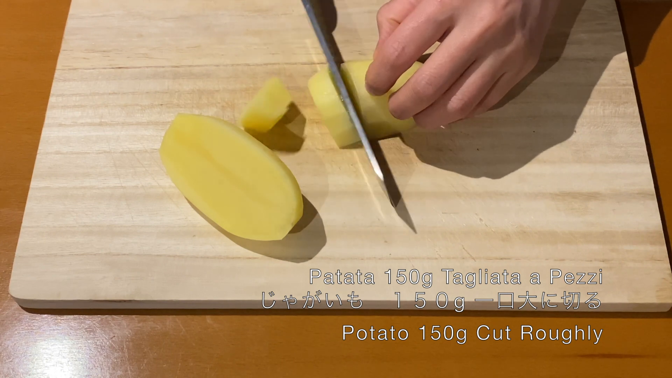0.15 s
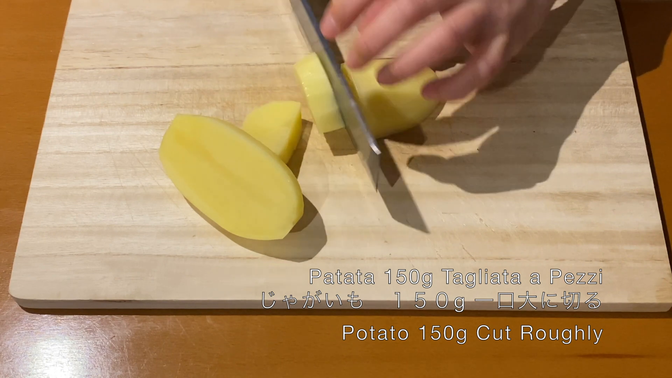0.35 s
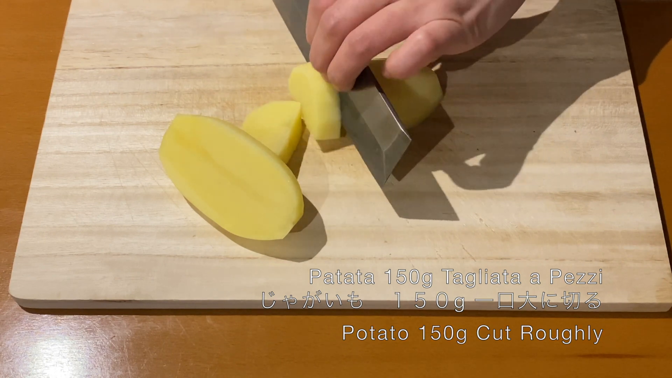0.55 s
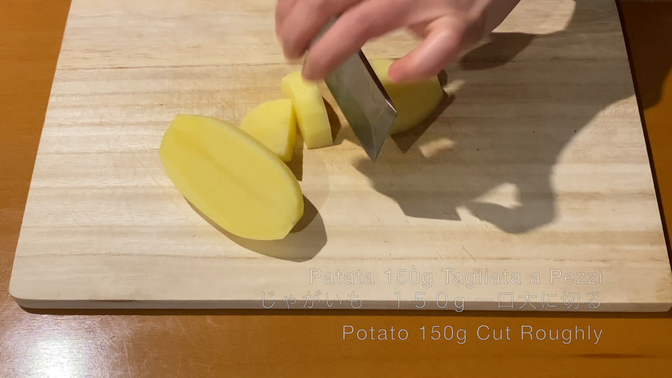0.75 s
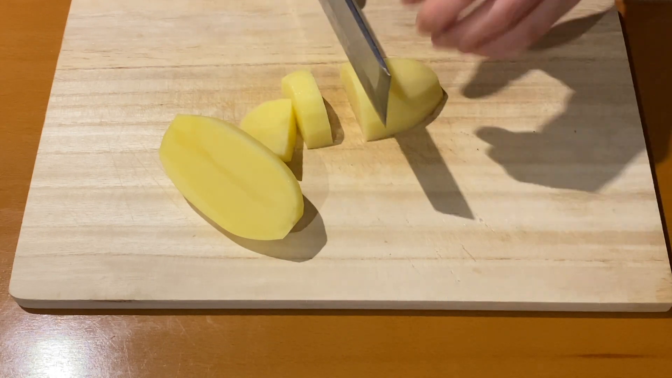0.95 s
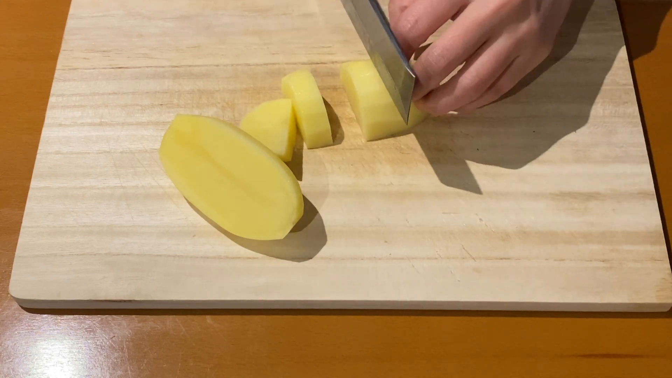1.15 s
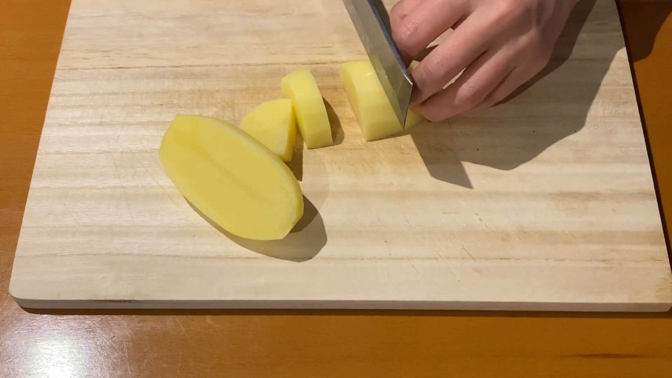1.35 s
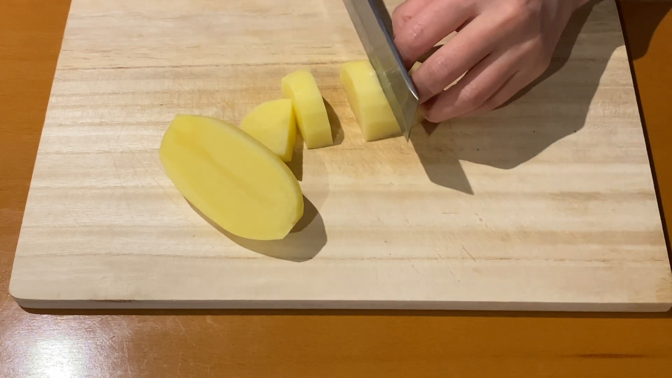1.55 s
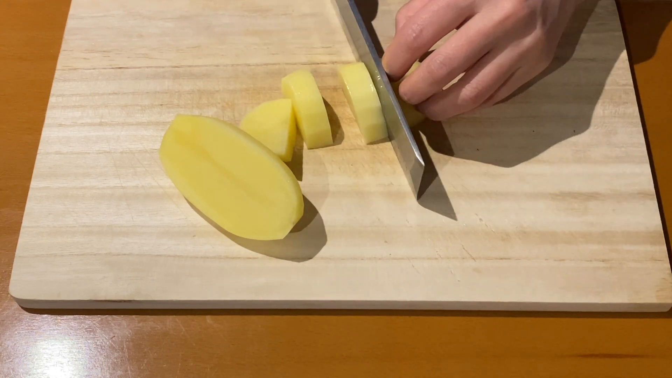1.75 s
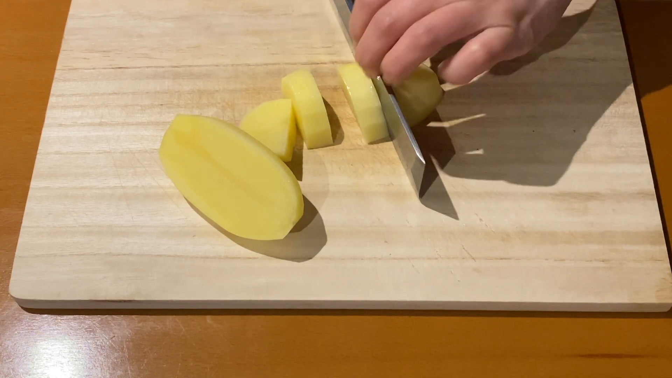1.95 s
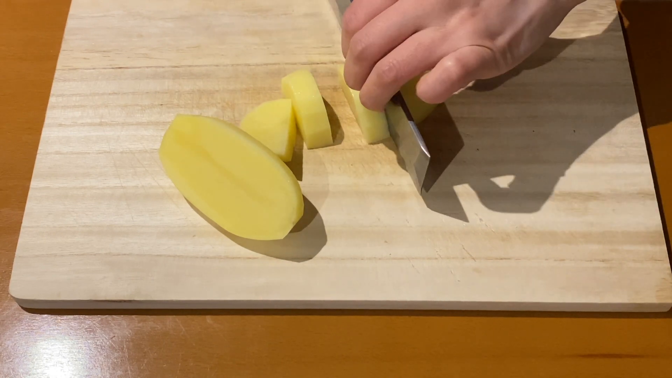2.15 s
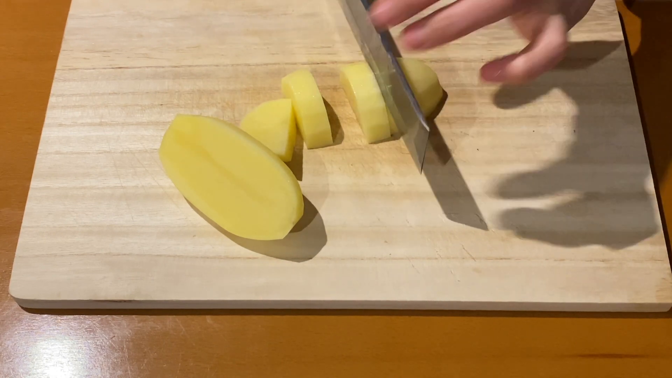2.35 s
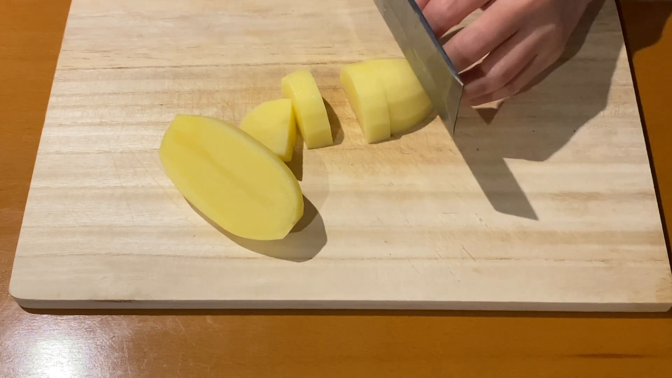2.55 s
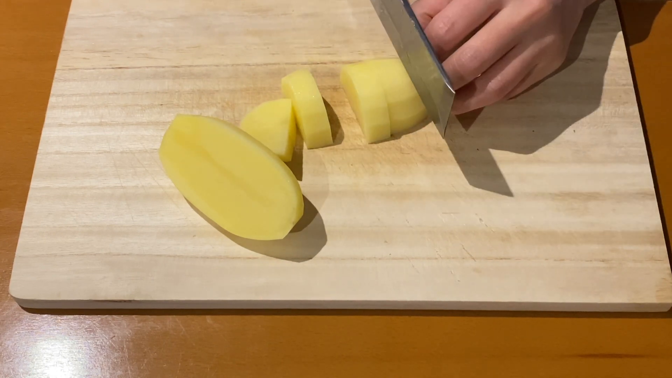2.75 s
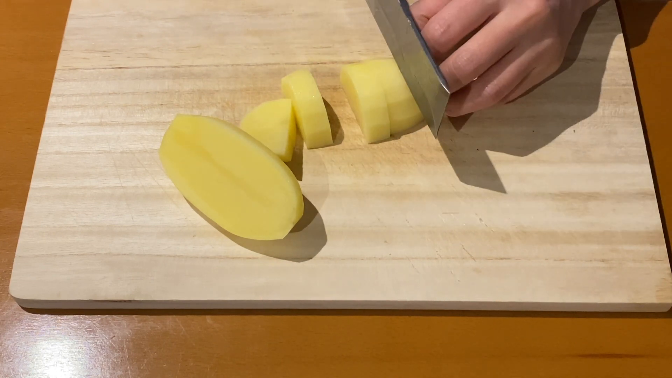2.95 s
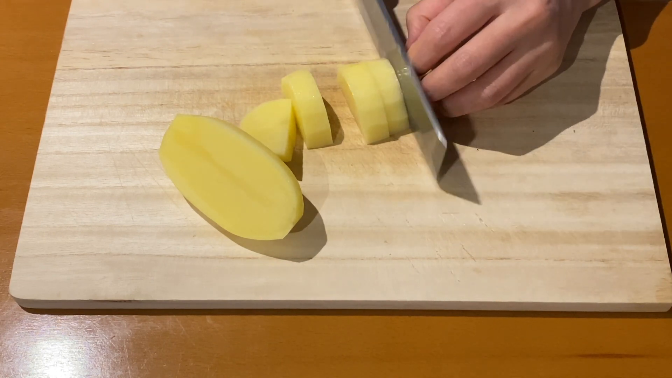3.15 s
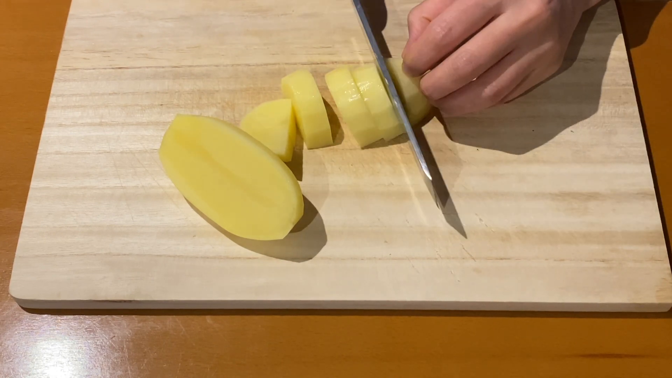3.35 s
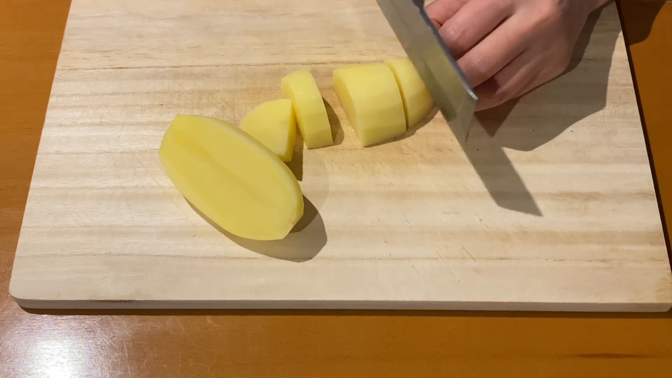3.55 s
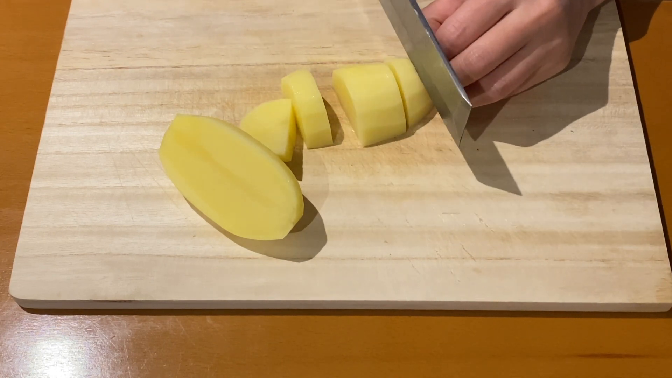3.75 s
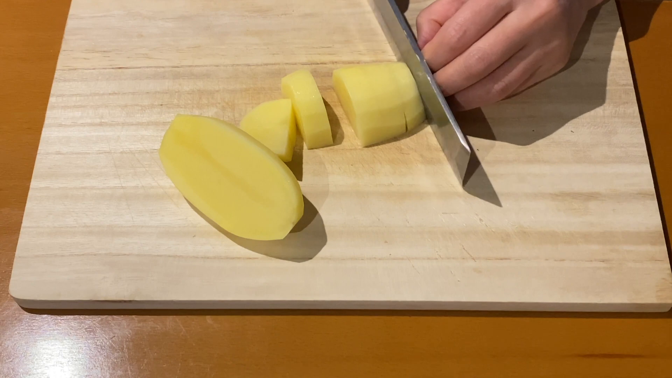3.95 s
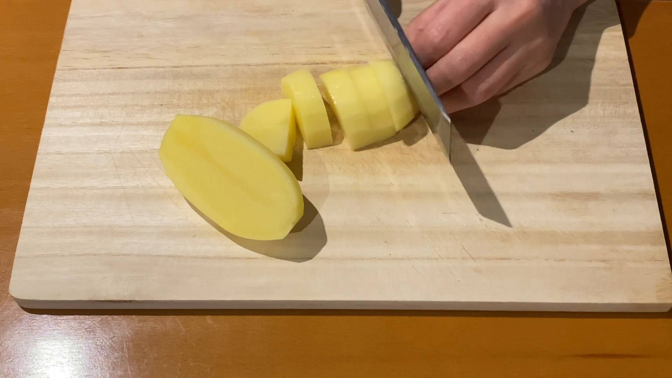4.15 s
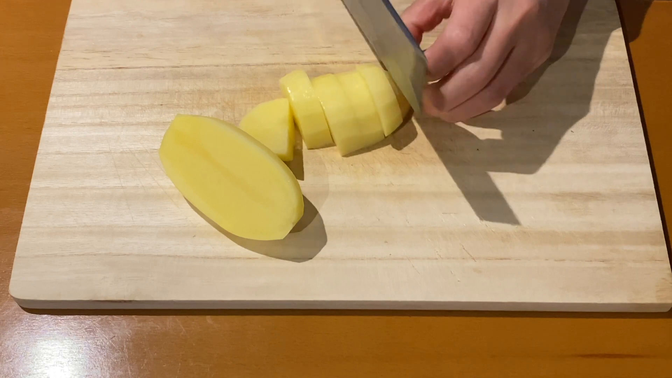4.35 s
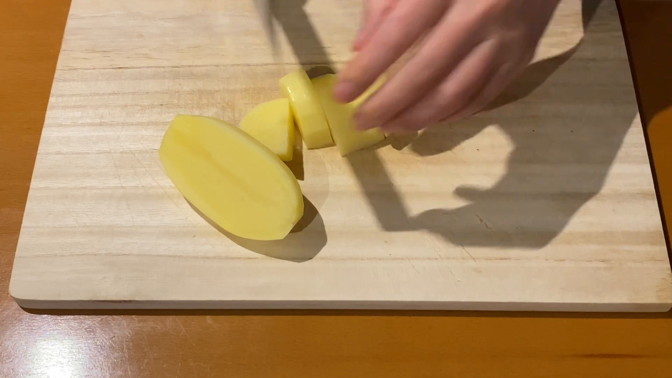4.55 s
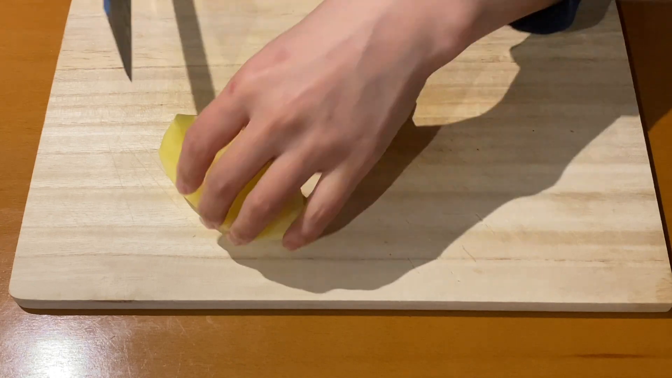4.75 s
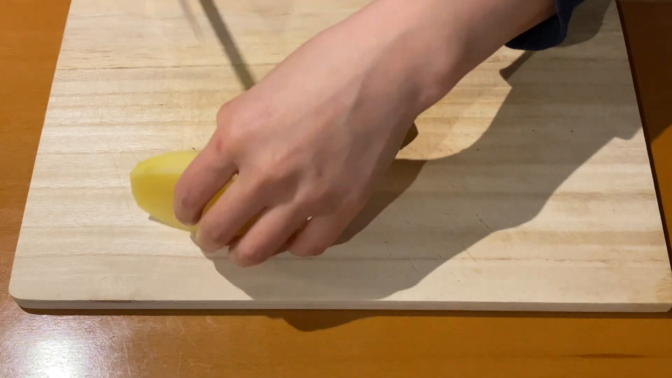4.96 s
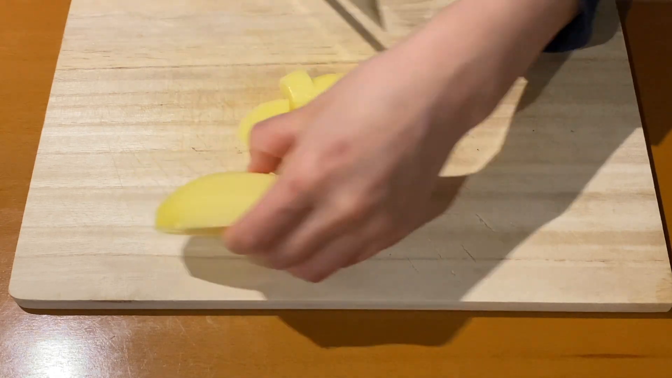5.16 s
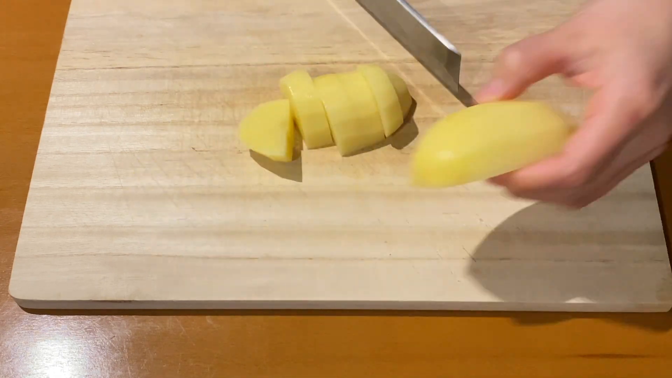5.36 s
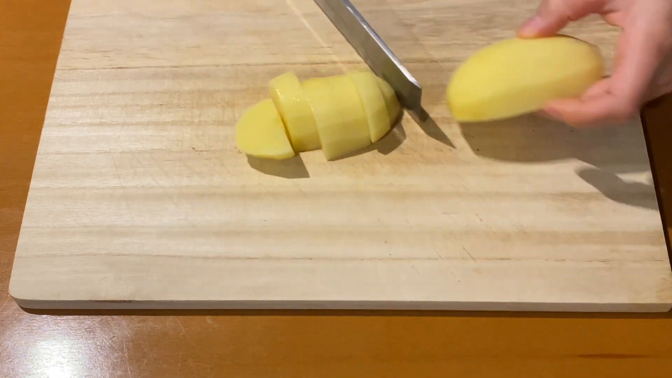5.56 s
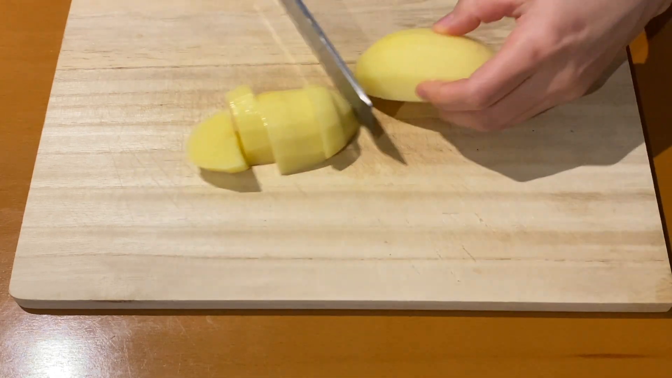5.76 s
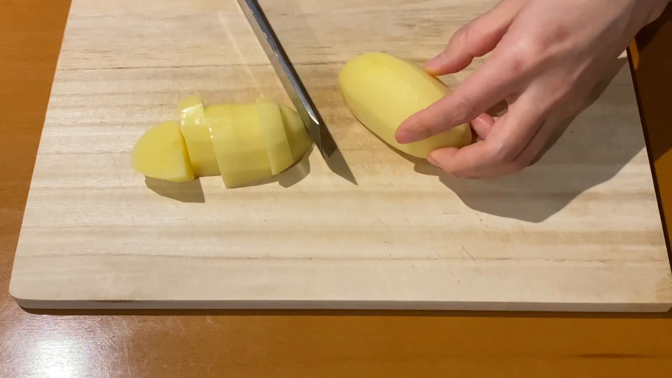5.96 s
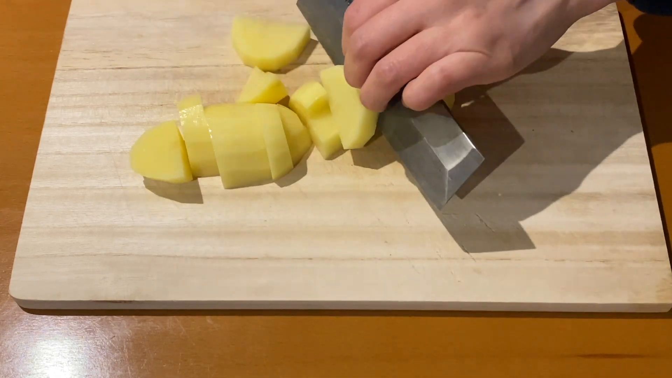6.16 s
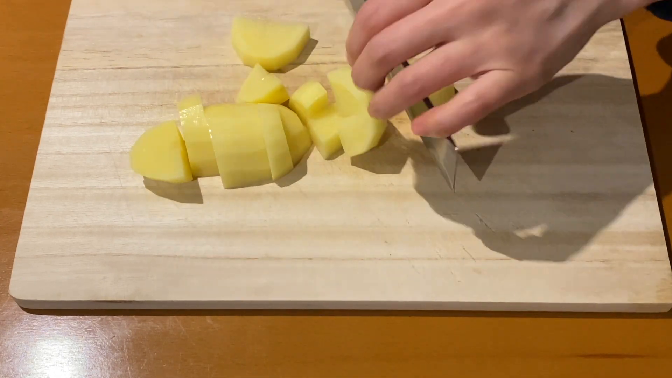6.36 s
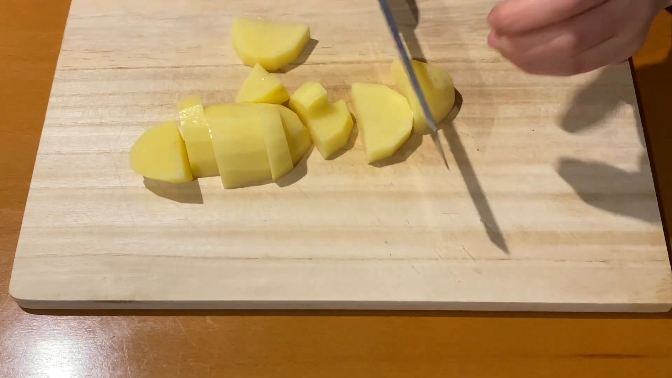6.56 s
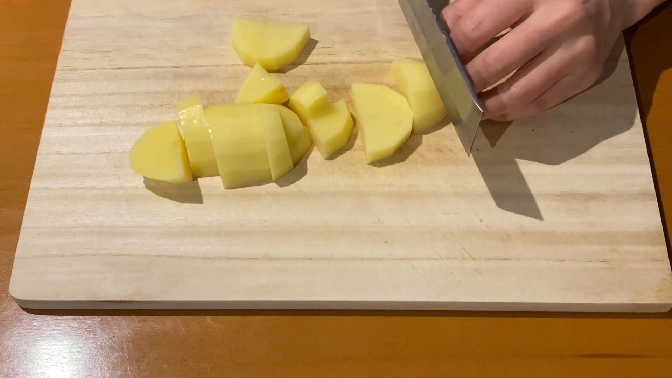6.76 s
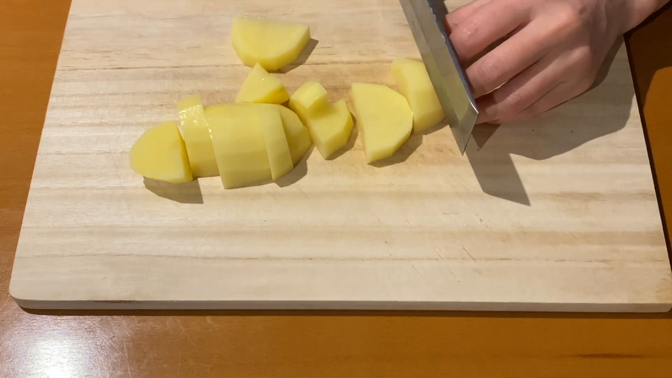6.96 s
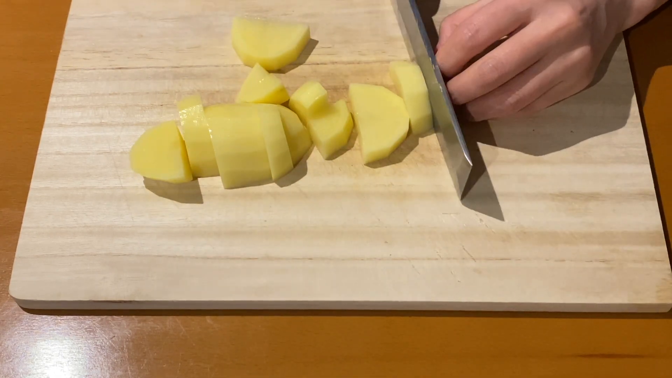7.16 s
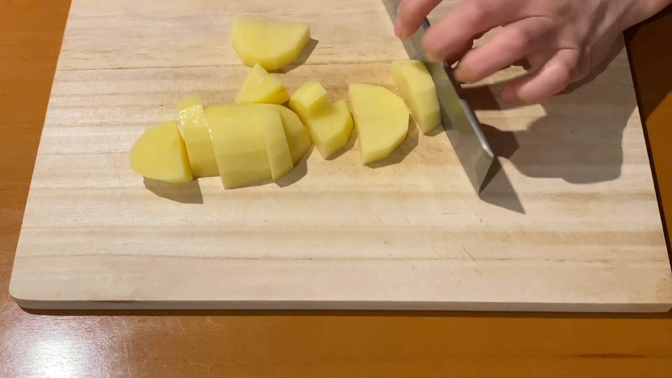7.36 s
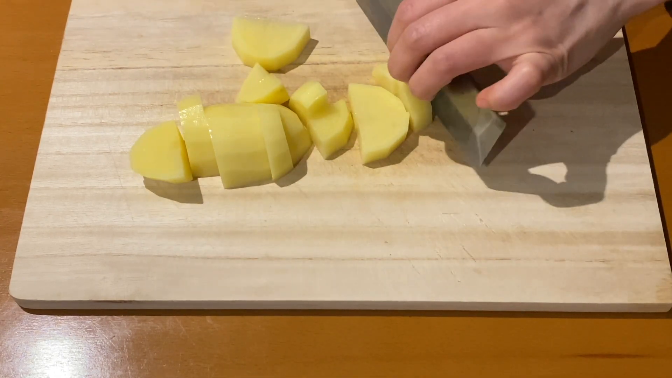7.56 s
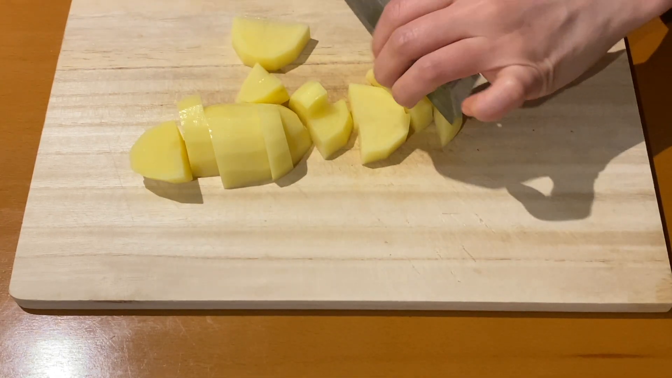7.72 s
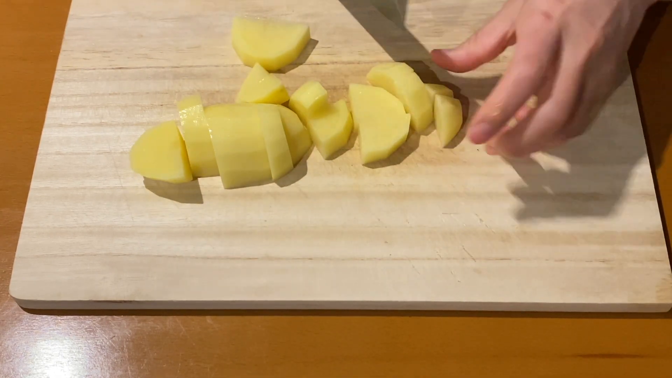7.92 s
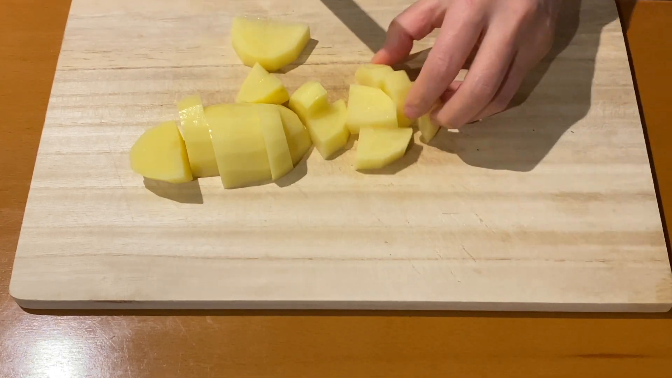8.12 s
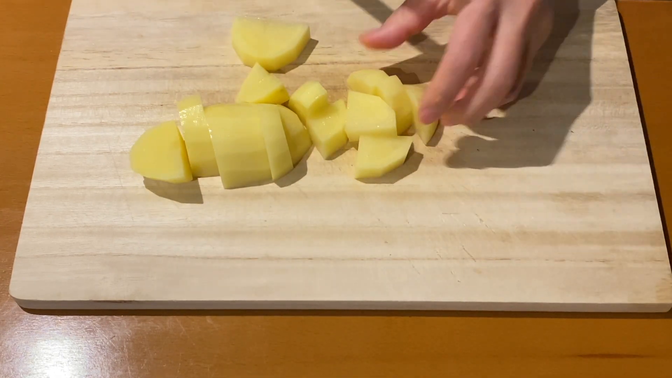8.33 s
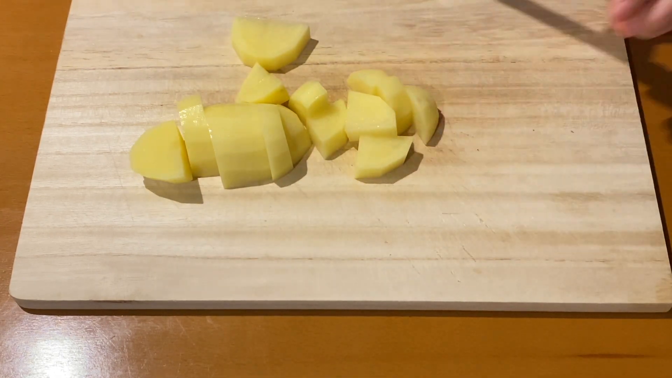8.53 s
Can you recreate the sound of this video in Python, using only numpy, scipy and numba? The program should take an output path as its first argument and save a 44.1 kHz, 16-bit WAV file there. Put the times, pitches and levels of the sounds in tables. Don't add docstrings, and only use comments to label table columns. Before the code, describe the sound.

Very close to a wooden board, a kitchen knife slices raw potato. A slow crisp slice swells into a loud dry knock, then a quicker slice and a short hard chop follow. A long quieter stretch has soft slides and ticks of pieces, then lighter taps and one last slice with a strong knock. Faint steel scrapes and wet rubs close it, over low fridge hum in a small, briefly reverberant kitchen.

```python
import sys
import numpy as np
from scipy import signal
from scipy.fft import rfft, irfft, next_fast_len
from scipy.io import wavfile
from scipy.ndimage import uniform_filter1d
from numba import njit

SR = 44100
rng = np.random.default_rng(int(sys.argv[2]) if len(sys.argv) > 2 else 0)


def to_linear_factor(level_db):
    exponent = np.asarray(level_db, float) / 20
    return 10 ** exponent


def transcribe(signal):
    frames = np.atleast_2d(signal).T
    limited = np.clip(frames, -1, 1)
    pcm = np.round(limited * 32767).astype(np.int16)
    wavfile.write(sys.argv[1], SR, pcm)


N = 383229


def over(hz, table, column=1):
    rows = np.array(table, float)
    return np.interp(np.log(hz + 1), np.log(rows[:, 0]), rows[:, column])


def colour(x, table):
    size = next_fast_len(len(x))
    gain = to_linear_factor(over(np.fft.rfftfreq(size, 1 / SR), table))
    y = irfft(rfft(x, size) * gain, size)[:len(x)]
    return y / np.sqrt(np.mean(y ** 2))


@njit
def svf(x, hz, width):
    y, band, low = np.empty(len(x)), 0., 0.
    for i in range(len(x)):
        g, k = np.tan(np.pi * hz[i] / SR), width / hz[i]
        v = (band + g * (x[i] - low)) / (1 + g * (g + k))
        band, low, y[i] = 2 * v - band, low + 2 * g * v, k * v
    return y


def walk(rate):
    k = int(SR / rate)
    held = np.repeat(rng.standard_normal(N // k + 1), k)
    return 1.3 * uniform_filter1d(uniform_filter1d(held, k), k)[:N]


def add(out, x, s):
    i = max(int(s * SR), 0)
    out[i:i + len(x)] += x[:N - i]


def peak(x, db):
    return x * to_linear_factor(db) / np.abs(x).max()


# f/Hz, level per Hz/dB
HUM = [(25, -15), (45, 4.5), (70, 2.5), (180, -1.5), (330, -6), (600, 0.5), (900, -9), (1350, -24),
       (1650, -27), (2200, -23.5), (2800, -32.5), (5500, -33), (11500, -41), (14500, -58)]
# f/Hz, level per Hz/dB
HISS = [(2000, -60), (2900, -19.5), (3350, -3.5), (3900, -0.5), (4150, -8.5), (4500, 0.5), (4950, -6),
        (5150, -1), (5350, -21), (5800, -60.5)]
# f/Hz, level/dB
WHINE = [(183.0, -75), (446.8, -77), (597.5, -74), (3510, -91.5), (3871, -89.5), (3957, -96), (4301, -90.5),
         (4500, -90.5), (4544, -97), (5146, -94.5)]
HUM_DB, HISS_DB = -62.5, -76


def fridge():
    t, swell = np.arange(N) / SR, walk(1.7)
    lines = np.zeros(N)
    for hz, db in WHINE:
        lines += to_linear_factor(db + 6 + 3.8 * walk(18)) * np.sin(2 * np.pi * (hz * t + rng.random()))
    air = []
    for _ in range(2):
        hum = to_linear_factor(HUM_DB + 0.16 * swell + 1.5 * walk(9)) * colour(rng.standard_normal(N), HUM)
        hiss = to_linear_factor(HISS_DB + .6 * walk(3.6)) * colour(rng.standard_normal(N), HISS)
        air.append(hum + hiss)
    return air[0] + lines, air[1]


def grains(per_s, spread_db):
    chance = rng.random((2, N))
    burst_db = spread_db * np.minimum(-np.log(1 - chance[1]), 3.5)
    size = (chance[0] < per_s / SR) * to_linear_factor(burst_db)
    return size * rng.choice([-1., 1.], N) + 0.85 * rng.standard_normal(N)


# entry t/s, full force t/s,
# entry level/dB, full-force level/dB, grit level re flesh/dB
CUTS = [
    (1.363, 1.531, -62.5, -47, 3),
    (2.915, 2.967, -70.5, -47, 0),
    (3.687, 3.697, -58, -45.5, -3),
    (6.895, 6.946, -71.5, -45.5, -.5),
]
# t/s, level/dB, 30 dB fade t/s (negative: row silent), grit level re
# flesh/dB, flesh resonance f/Hz
NICKS = [(.006, -55.5, 0.15, -16, 1248), (.026, -76, -0.1, -25, 1100), (.508, -90, -0.5, 0, 980),
         (1.362, -62, 0.14, -13.5, 1117), (1.984, -81.5, 0.2, -3, 1098), (2.898, -63, 0.47, -12.5, 1195),
         (3.622, -44, 0.03, -21.5, 1320), (5.975, -51, 0.08, -38, 1125), (6.06, -55, 0.12, -40, 1076),
         (6.27, -89, 0, 1, 995), (6.813, -62.5, 0.07, -12, 1173), (7.535, -75, -0.04, 1.5, 990),
         (7.6, -74, 0.5, -6, 1050)]
# t/s, length t/s, level/dB, grit level re flesh/dB,
# flesh resonance f/Hz
SLIDES = [(0.688, .09, -79.5, -10, 985), (2.12, .05, -81.5, -9, 1050), (2.685, .07, -77, -10, 1180),
          (3.18, .08, -69.5, -1.5, 1050), (4.022, .13, -67, -2, 1340), (4.67, .08, -78.5, -5, 1010),
          (5.372, .04, -71, -0.5, 1270), (5.4, .16, -75.5, 0, 1200), (5.551, .35, -68, 4, 1280),
          (6.149, .07, -92, 5.5, 1000), (7.269, .07, -68, -5.5, 1340), (7.36, .14, -84.5, 7, 1200),
          (7.907, .07, -68, -4.5, 1190), (7.99, .14, -71.5, -4, 1090), (8.589, .14, -83, 5, 1110)]
BOTTOM_HZ, RISE_HZ_PER_S = 1370, 1400
CUT_RASP_DB, RASP_DB_PER_S, CUT_FINE_DB, FINE_DB_PER_S = -2, 160, -10, 100
EASE_DB, EASE_S = -3.5, .03
SETTLE_DB, SETTLE_GRIT_DB, SETTLE_DB_PER_S = -24.5, 6.5, 170
NICK_ATTACK_S, NICK_FINE_DB = .005, 5
SLIDE_ATTACK, SLIDE_RELEASE = 0.089, .4
SLIDE_EDGE_DB, SLIDE_FINE_DB = 13, -15.5


def strokes_of_flesh(t):
    for enter, full, enter_db, full_db, grit_db in CUTS:
        board = min(knock[0] for knock in KNOCKS if knock[0] > enter)
        u = t[(t >= enter) & (t < board)]
        left = board - u
        db = np.interp(u, [enter, full], [enter_db, full_db])
        flesh_db = db + EASE_DB * np.exp(-left / EASE_S)
        rasp_db = db + grit_db + CUT_RASP_DB - RASP_DB_PER_S * left
        fine_db = db + grit_db + CUT_FINE_DB - FINE_DB_PER_S * left
        yield u, flesh_db, rasp_db, fine_db, BOTTOM_HZ - RISE_HZ_PER_S * left
        u = t[(t >= board) & (t < board + .2)]
        db = full_db + SETTLE_DB - SETTLE_DB_PER_S * (u - board)
        grit = db + SETTLE_GRIT_DB
        yield u, db, grit + CUT_RASP_DB, grit + CUT_FINE_DB, 1000
    for s, top_db, fade, grit_db, hz in NICKS:
        u = t[(t >= s - NICK_ATTACK_S) & (t < s + 1.5 * fade)]
        db = top_db - 30 * np.maximum((s - u) / NICK_ATTACK_S, (u - s) / fade)
        yield u, db, db + grit_db, db + grit_db + NICK_FINE_DB, hz
    for s, length, top_db, grit_db, hz in SLIDES:
        u = t[(t >= s) & (t < s + length)]
        part = (u - s) / length
        ramp = np.minimum(np.minimum(part / SLIDE_ATTACK, (1 - part) / SLIDE_RELEASE), 1)
        db = top_db - SLIDE_EDGE_DB * (1 - ramp)
        yield u, db, db + grit_db, db + grit_db + SLIDE_FINE_DB, hz


# f/Hz, level per Hz/dB
RASP = [(1500, -9.5), (2200, -4), (4000, -2), (6000, -4.5), (8000, -11.5)]
# f/Hz, level per Hz/dB
FINE = [(6000, -16.5), (8000, 11.5), (11000, 2), (14000, -5.5), (15700, -1), (16100, -48)]


def rubs():
    t = np.arange(N) / SR
    gain, hz = np.zeros((3, N)), np.full(N, 1300.)
    for u, *db, flesh_hz in strokes_of_flesh(t):
        on, new = np.round(u * SR).astype(int), to_linear_factor(db)
        hz[on] = np.where(new[0] > gain[0, on], flesh_hz, hz[on])
        gain[:, on] = np.hypot(gain[:, on], new)
    cells = grains(per_s=4400, spread_db=4.0)
    flesh = svf(svf(cells, hz, 480.), hz, 380.)
    flesh = flesh * to_linear_factor(2.8 * np.clip(walk(110), -2, 1.5))
    bulk = colour(cells, [(200, -21), (500, -5), (900, -2.5), (1500, -1.5), (2200, -10), (3200, -26)])
    flesh = flesh / flesh.std() + to_linear_factor(-1.0) * bulk
    spray = grains(per_s=1200, spread_db=2.5)
    flutter = to_linear_factor(1.2 * walk(70))
    rasp = colour(spray, RASP) * flutter
    fine = colour(spray, FINE) * flutter
    return to_linear_factor(-1.0) * gain[0] * flesh + to_linear_factor(3.0) * gain[1] * rasp + to_linear_factor(5.0) * gain[2] * fine


# t/s, peak level/dB, weight level re peak/dB, crack level re peak/dB, loudest ring f/Hz
KNOCKS = [(0.01, -27.5, -3.5, -10.5, 1420), (1.573, 2.5, -16.5, -14.5, 887), (3.072, 3, -16.5, -9.5, 840),
          (3.77, 3, -16.5, -8.5, 857), (5.954, -11.5, -20.5, -44, 1035), (6.073, -28, -9.5, -11.5, 928),
          (6.39, -18, -27, -36.5, 1020), (6.419, -33, -16, -27, 703), (7.012, 2, -16, -10, 855),
          (7.347, -29, -15, -39.5, 715), (7.587, -36, -8, -12.5, 679)]
# f/Hz, level/dB, T60 t/s
BOARD = [(65.6, -4.5, 0.44), (84.74, -6.5, 0.33), (102, 0.5, 0.073), (144, 4, .12), (206, -9, 0.06),
         (301, -4.5, 0.038), (350, -5.5, 0.018), (406, -4, 0.028), (477, -1, 0.029), (530, 0.5, 0.011),
         (633, -2.5, 0.01), (762, -2.5, 0.013), (841.8, -2.5, 0.02), (1000, -1.5, 0.0086),
         (1150, -2.5, 0.0048), (1320, -5.5, 0.029), (1367, -2.5, .009)]
# f/Hz, level per Hz/dB
CRACK = [(1200, -19.5), (1800, 0.5), (2900, -4.5), (3600, -16), (5000, -20.5), (8000, -27), (15000, -30.5)]
# f/Hz, level per Hz/dB
BODY = [(130, -22), (220, -5), (450, -1), (900, 0.5), (1300, -9.5), (2200, -22), (3500, -36.5)]
BODY_DB, SENT_CRACK_DB = -1, -2.5
BOOM_DB, BOOM_PER_SOFT = -13, .4
SPOT_TILT_DB = 24.5


def knocks():
    out, low, sent = np.zeros((3, N))
    t = np.arange(int(.4 * SR)) / SR
    click = 1. * (np.arange(len(t)) == 200)
    push = np.hanning(int(0.00078 * SR))
    hz, mode_db, t60 = np.transpose(BOARD)
    opposed = (-1) ** np.arange(len(hz))
    chance = rng.standard_normal((len(KNOCKS), len(BOARD) + len(t)))
    for (s, top_db, thump_db, crack_db, ring_hz), z in zip(KNOCKS, chance):
        scatter_db = 2 * z[:len(hz)]
        tilt_db = SPOT_TILT_DB * np.log2(hz / 850) * np.log2(ring_hz / 850) * (hz > 450)
        size = to_linear_factor(mode_db + scatter_db + tilt_db) * opposed
        rings = size[:, None] * np.sin(2 * np.pi * np.outer(hz, t)) * to_linear_factor(-60 * t / t60[:, None])
        rise = t * ring_hz / 1.1
        spot = -np.sin(2 * np.pi * ring_hz * t) * (rise * np.exp(-rise)) ** 3.8
        crackle = np.roll(z[len(hz):] * t * np.exp(-t / .001), 200)
        fibres = colour(crackle + .0025 * np.roll(click, 30), CRACK)
        boom = rings[hz < 170].sum(0) * np.minimum(t / 0.0064, 1)
        upper = np.convolve(rings[hz > 450].sum(0), push)
        thump = np.convolve(rings[(hz > 170) & (hz <= 450)].sum(0), push)
        spot, upper = peak(spot, top_db - 7.5), peak(upper, top_db - 14.0)
        fibres = peak(fibres, top_db + crack_db - 4.5)
        boom_db = top_db + thump_db + BOOM_DB - BOOM_PER_SOFT * crack_db - 7.5
        s += .0008
        add(out, spot, s)
        add(out, upper, s + .0009)
        add(out, peak(thump, top_db + thump_db - 3), s + 0.0014)
        add(low, peak(boom, boom_db), s + 0.00069)
        add(out, fibres, s - 170 / SR)
        body = colour(click, [(f * (ring_hz / 850) ** 0.95, db) for f, db in BODY])
        body = body * to_linear_factor(BODY_DB) * np.hypot(spot.std(), upper.std())
        crack = colour(click, CRACK) * to_linear_factor(SENT_CRACK_DB) * fibres.std()
        add(sent, body + crack, s - 170 / SR)
    return signal.sosfilt(signal.butter(1, 90, "high", fs=SR, output="sos"), [out + low, sent + low])


# t/s, peak level/dB, middle level re peak/dB, low level re peak/dB
TICKS = [(0.0113, -56.5, 6, 5), (0.0443, -60, -15, -8), (0.0862, -71, -5.5, 9.5), (0.5097, -64, -11, -17),
         (1.386, -69, -3, 12), (1.4064, -71, -1.5, 9), (1.678, -62, -11.5, -10), (1.9869, -60, -9, -12.5),
         (2.144, -73, 2, 1.5), (3.1921, -53, -4.5, 5), (3.3915, -62.5, -8, 6.5), (3.8621, -54, -7.5, 3),
         (4.6809, -82.5, 3, 8), (4.8686, -84, 12.5, 18.5), (4.9975, -87, 14.5, 2), (5.3782, -65, 1, 14.5),
         (5.5869, -62.5, -11, 16), (5.7618, -45, -17.5, -17.5), (5.89, -71, -5, 4), (5.954, -64, -1, 34.5),
         (6.059, -77, -9, -6), (6.3879, -50, -7, 25), (6.4203, -47, -19.5, -10), (7.3474, -56, -8, 9.5),
         (7.4559, -50, -13.5, -1), (7.5827, -63, -4, 16.5), (7.9264, -67, 3.5, 9.5), (7.9862, -69, 5, 3),
         (4.112, -69, 5, 8), (8.1115, -76, 2.5, 3)]
TICK_MS = 6.2


def ticks():
    out, t = np.zeros(N), np.arange(int(0.042 * SR)) / SR
    fade = np.minimum(t / .001, 1) * np.exp(-3000 * t / TICK_MS)
    noise = rng.standard_normal((len(TICKS), len(t)))
    for (s, top_db, mid_db, low_db), n in zip(TICKS, noise):
        spit = peak(colour(n, FINE) * fade, top_db + 6.5)
        snap = peak(colour(n, RASP) * fade, top_db + mid_db + 11.0)
        note = peak(svf(n * fade, np.full(len(t), 1250.), 350.0), top_db + low_db - 5.0)
        add(out, spit + snap + note, s + .0009)
    return out


# f/Hz, T60 t/s, level re direct energy/dB
KITCHEN = [(60.16, .5, -2.5), (150, 0.8, -5.5), (310, .28, -3.5), (800, 0.29, -8.5), (1990, 0.36, -14),
           (5000, 0.2, -12), (15000, .15, -15.5)]


def kitchen(x):
    t = np.arange(int(.6 * SR)) / SR
    f, tails = np.fft.rfftfreq(len(t), 1 / SR), []
    onset = np.clip((t - .004) / 0.0014, 0, 1)
    for _ in range(2):
        noise, tail = rfft(rng.standard_normal(len(t))), 0
        for hz in 45 * 2 ** np.arange(0, 8.6, .5):
            window = np.clip(1 - 2 * np.abs(np.log2((f + 1) / hz)), 0, 1)
            band = irfft(noise * window, len(t))
            t60 = over(hz, KITCHEN)
            decay = to_linear_factor(over(hz, KITCHEN, column=2) - 60 * t / t60)
            tail = tail + band * decay * np.sqrt(14 / t60 / SR)
        tails.append(signal.fftconvolve(x, tail * onset)[:N])
    return tails


BLADE = [6800, 8180, 8700, 9400, 9820, 10340, 10600, 12800, 11970, 13260, 14250, 14730, 15680]
# t/s, peak level/dB, length t/ms, two modes the grip leaves free f/Hz, f/Hz
STROKES = [(0.503, -58, 8.2, 8180, 10600), (1.364, -51.5, 3, 8700, 14730), (1.4, -63, 30, 10340, 14730),
           (2.468, -74, 4.6, 13260, 14250), (2.897, -66.5, 15.5, 13260, 15680),
           (6.26, -69, 29, 9820, 11970), (6.812, -63.5, 8, 14730, 10340), (6.905, -53.5, 30, 11970, 15680),
           (7.527, -53, 10, 11970, 14730), (7.597, -46.5, 16, 9820, 8700), (7.618, -61.5, 14, 14250, 11970)]
BLADE_T60_S = .075


def blade():
    out, t = np.zeros(N), np.arange(int(.15 * SR)) / SR
    chance = rng.standard_normal((len(STROKES), len(BLADE) + len(t)))
    for (s, top_db, ms, *free), z in zip(STROKES, chance):
        hz = np.array(BLADE + free, float)
        weight = to_linear_factor(np.r_[-9 + 3.5 * z[:len(BLADE)], 0, -3])
        rings = weight @ np.sin(2 * np.pi * np.outer(hz, t)) * to_linear_factor(-60 * t / BLADE_T60_S)
        scrape = z[len(BLADE):][:int(ms * SR / 1000) + 2]
        add(out, peak(np.convolve(rings, scrape), top_db), s)
    return out


# f/Hz, left lead/rad, left minus right level/dB
PORTS = [(100, 0, -.4), (380, .05, -4), (750, .25, -4.2), (1300, .3, -.5), (1900, .1, 0), (2550, .8, 0),
         (3700, .3, 0), (4250, .6, 0), (5000, 2.3, 0), (5600, 1.5, 0), (8500, 3.1, 0), (11200, 3.2, 0),
         (13000, 4.3, 0), (16000, 5.6, 0)]


def ports(first, second, lead, like):
    size = next_fast_len(N)
    f = np.fft.rfftfreq(size, 1 / SR)
    a, b, like = rfft(first, size), rfft(second, size), np.clip(like(f), 0, 1)
    tilt = to_linear_factor(over(f, PORTS, column=2) / 2) * np.exp(.5j * (over(f, PORTS) + lead(f)))
    right = (like * a + np.sqrt(1 - like ** 2) * b) / tilt
    return np.array([irfft(a * tilt, size)[:N], irfft(right, size)[:N]])


# f/Hz, extra left lead/rad, likeness of the ports (0-1)
AROUND = [(60, 0, 1), (130, 0, .985), (250, 0, .7), (420, 1.5, .3), (700, 2.2, .75), (1300, 2.2, .4),
          (1800, .3, .9), (5000, 0, .9), (6500, 0, .82), (9000, 0, .99), (11000, 0, .97), (15000, 0, .6)]
NEAR_LIKE = 0.96


def scene():
    def lead(f):
        return over(f, AROUND)

    def like(f):
        return over(f, AROUND, column=2)

    air = fridge()
    small = rubs()
    blows, sent = knocks()
    small = small + ticks() + blade()
    near, wall = blows + small, kitchen(sent + small)
    late = np.roll(near, int(0.0013 * SR))
    direct = ports(near, late, lambda f: 0, lambda f: np.maximum(NEAR_LIKE, like(f)))
    walls = ports(*wall, lambda f: 0.34 * lead(f), like)
    return direct + walls + ports(*air, lead, like)


def top_cut(x):
    return signal.sosfilt(signal.butter(12, 16470, fs=SR, output="sos"), x)


def record(dry):
    dry = signal.sosfilt(signal.butter(2, 30, "high", fs=SR, output="sos"), dry)
    dry = signal.sosfilt(signal.ellip(10, .2, 70, 15830, fs=SR, output="sos"), dry)
    return top_cut(dry)


dry = scene()
out = record(dry)
transcribe(out)
```